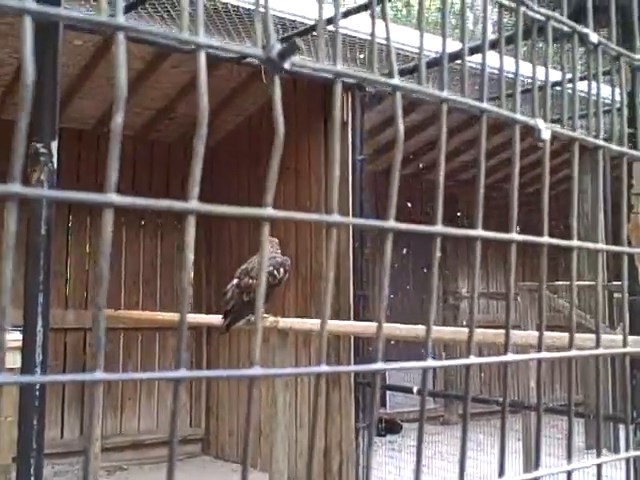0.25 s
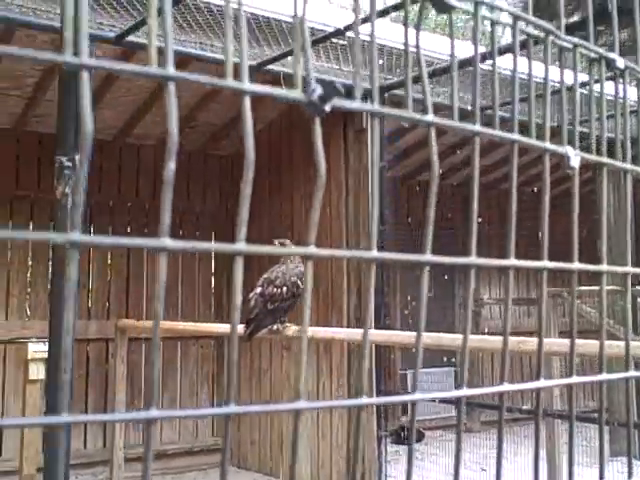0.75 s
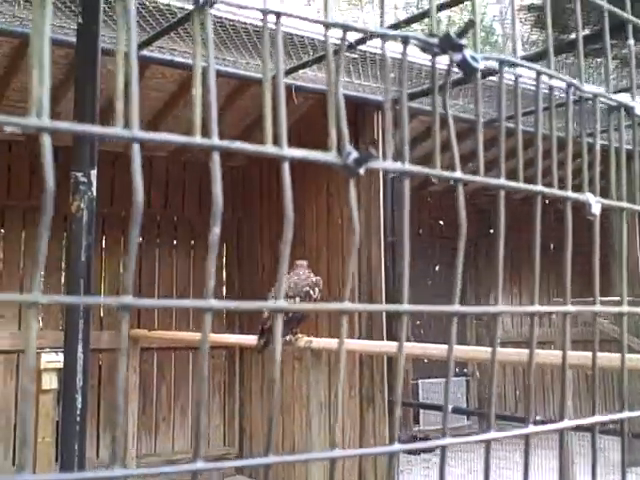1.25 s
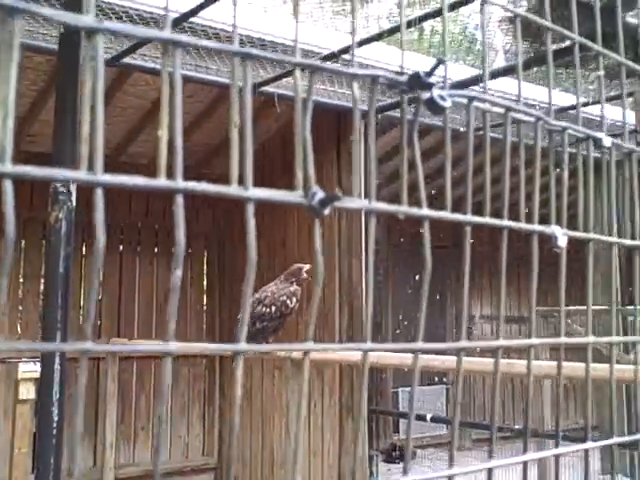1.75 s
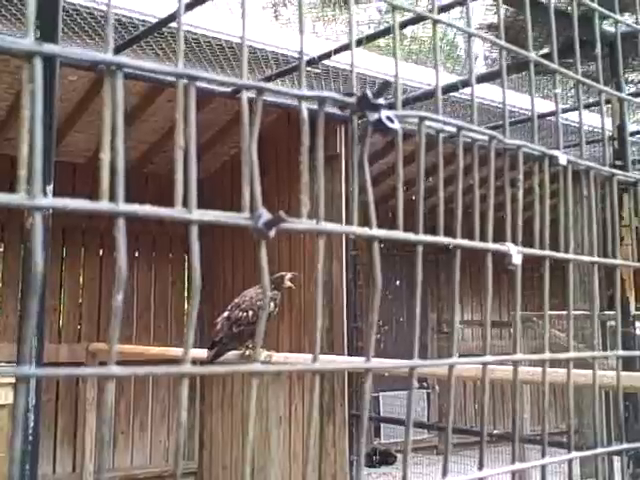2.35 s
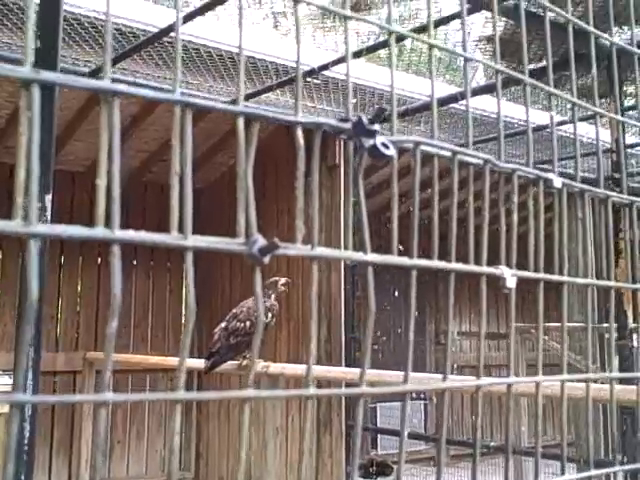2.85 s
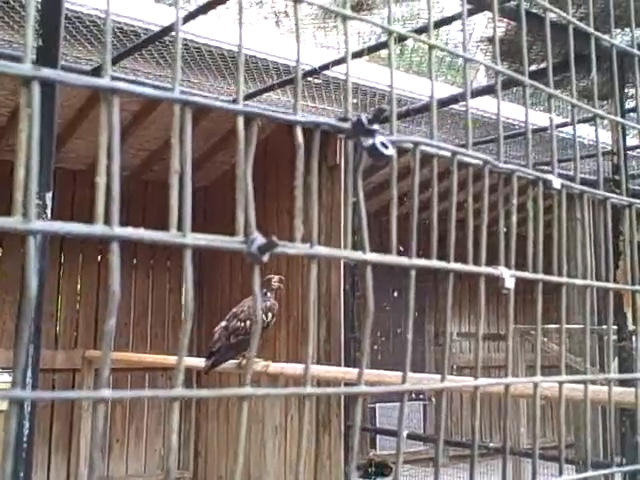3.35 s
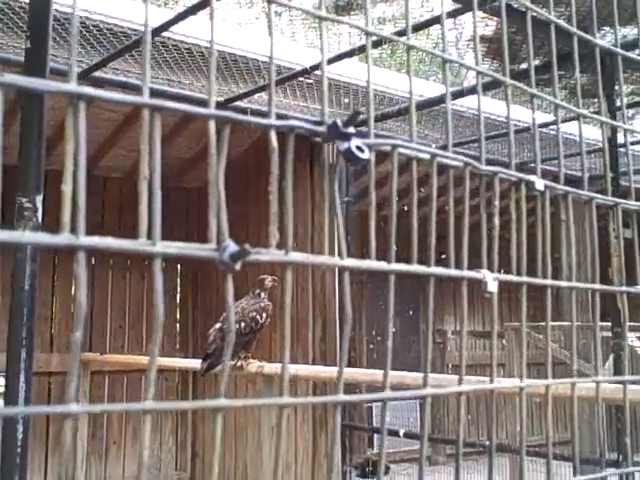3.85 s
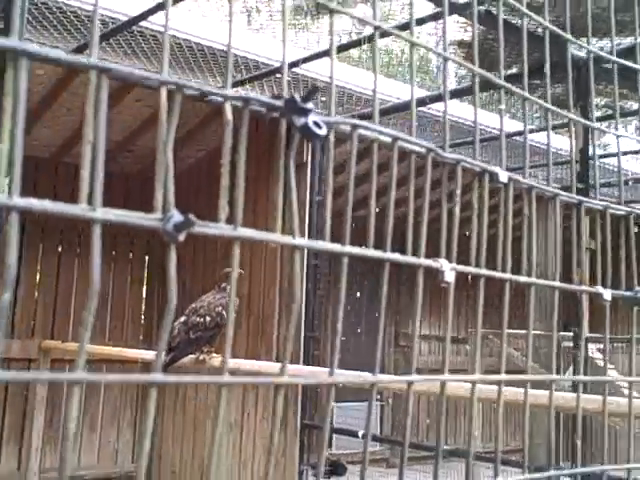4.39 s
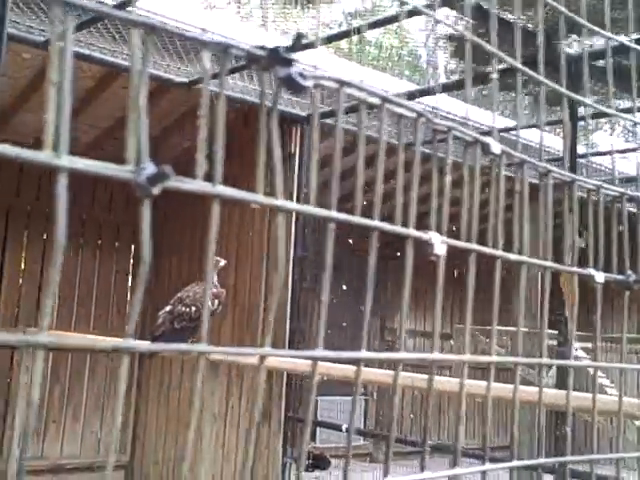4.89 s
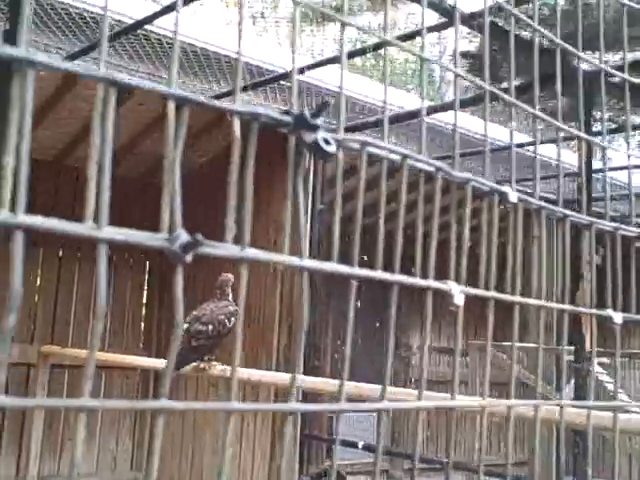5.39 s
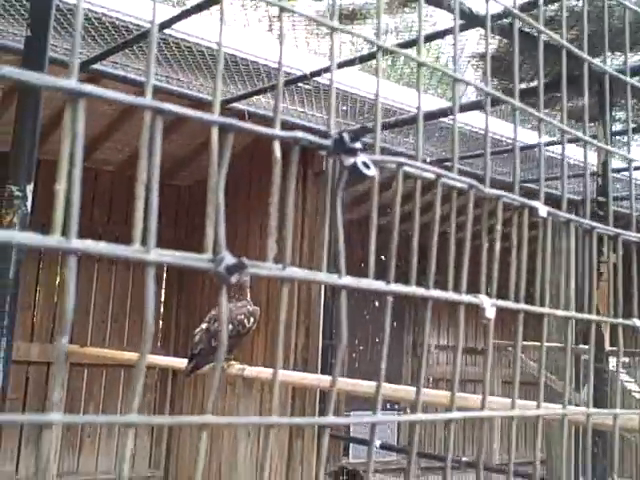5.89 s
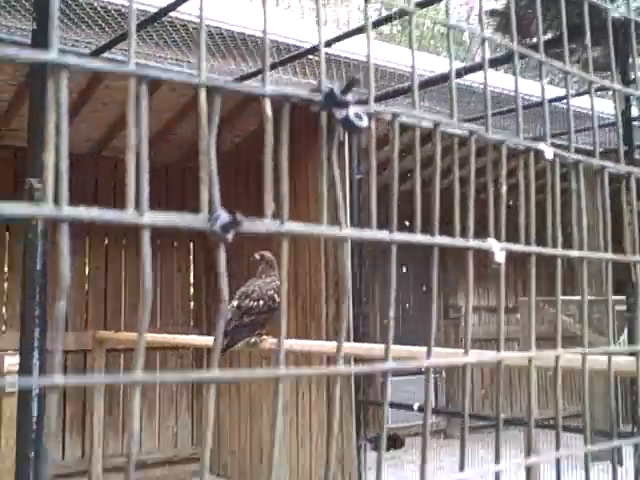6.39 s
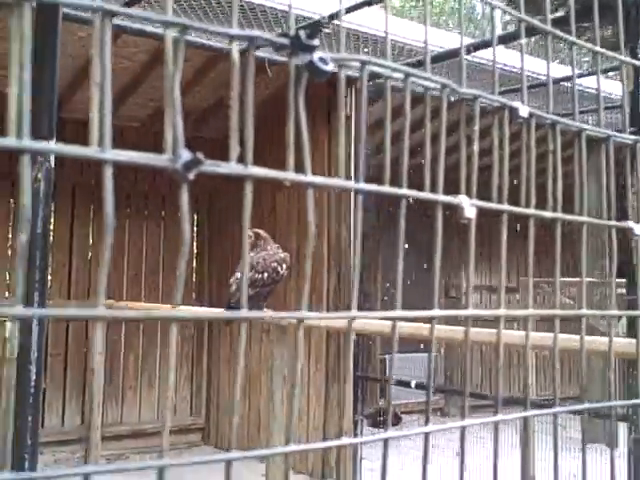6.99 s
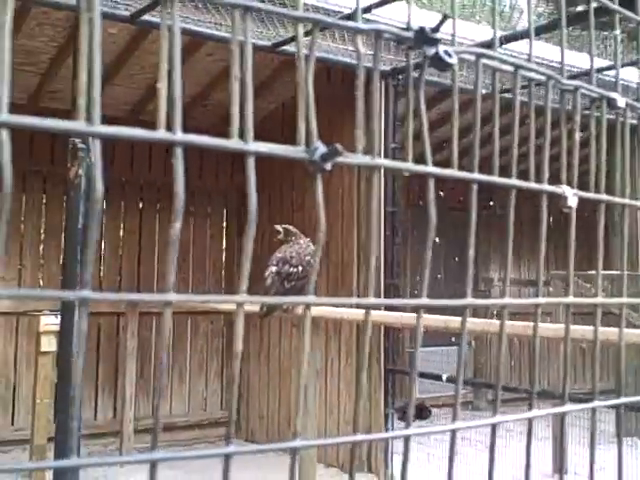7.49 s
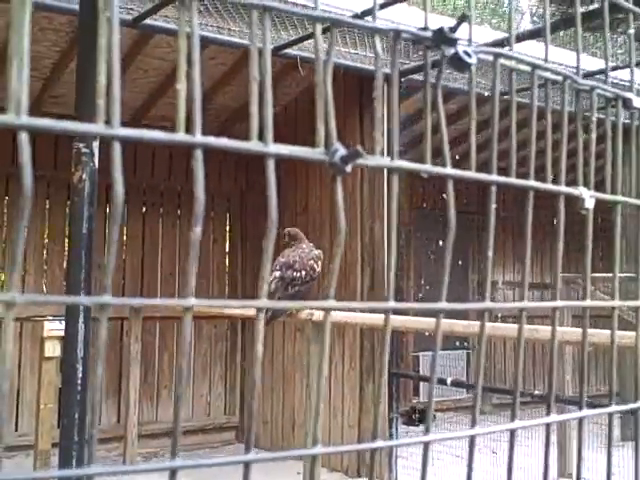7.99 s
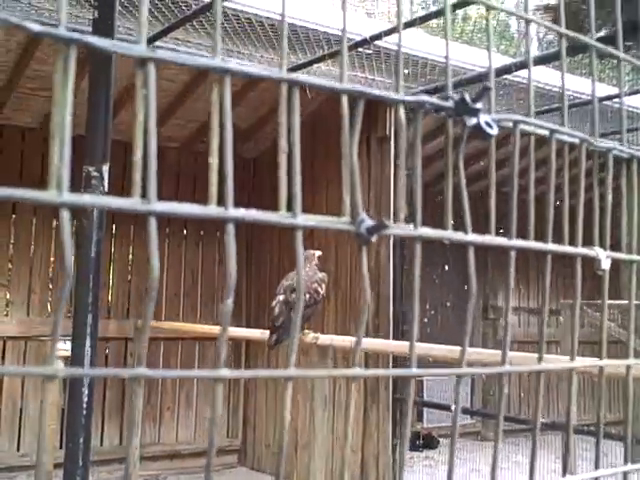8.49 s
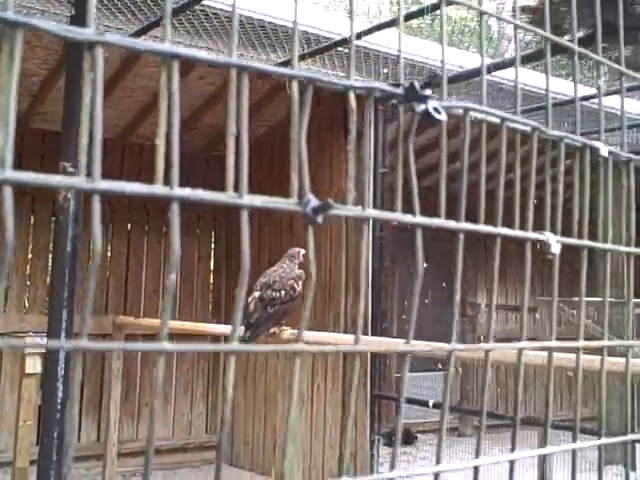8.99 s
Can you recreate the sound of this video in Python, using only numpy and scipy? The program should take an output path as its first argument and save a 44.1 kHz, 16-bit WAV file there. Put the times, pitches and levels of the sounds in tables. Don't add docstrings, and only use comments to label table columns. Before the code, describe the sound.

A large young bird of prey, a few metres from a small hand-held camera, gives quick bursts of low chucks mixed with high whistles and squeaks in the first few seconds. A long pause follows, filled with hiss, far traffic and crisp plastic creaks. Later it chirps again in shorter bursts while light gusts rumble on the microphone. Plank walls add a short, close echo.

```python
import sys
import numpy as np
from scipy import signal
from scipy.fft import rfft, irfft, next_fast_len
from scipy.io import wavfile
from scipy.ndimage import map_coordinates

SR = 44100
rng = np.random.default_rng(int(sys.argv[2]) if len(sys.argv) > 2 else 0)


def magnitude_from_level(level_db):
    exponent = np.asarray(level_db, float) / 20
    return 10 ** exponent


def master_out(mix):
    frames = np.transpose(np.atleast_2d(mix))
    ceiling = np.clip(frames, -1, 1)
    pcm = np.round(ceiling * 32767).astype(np.int16)
    wavfile.write(sys.argv[1], SR, pcm)


N = 407925

SQUEAK_SIDE_PARTIALS = [0, 0, -16.5]


def unit(x):
    return x / np.sqrt(np.mean(x ** 2) + 1e-20)


def along(points, hz):
    f, v = np.transpose(points)
    return np.interp(np.log(hz + 1), np.log(f + 1), v)


def wobble(rate):
    knots = rng.standard_normal(int(N * 2000 / SR) + 4)
    return map_coordinates(knots, [np.arange(N) * rate / SR])


def noise(response):
    m = next_fast_len(N)
    spectrum = rfft(rng.standard_normal(m)) * response(np.fft.rfftfreq(m, 1 / SR))
    return unit(irfft(spectrum, m)[:N])


def coloured(curve):
    return noise(lambda f: magnitude_from_level(along(curve, f)))


def band(low_hz, high_hz):
    return lambda f: 1 / np.sqrt((1 + (low_hz / (f + 1)) ** 8) * (1 + (f / high_hz) ** 8))


def hump(middle, half_width):
    return lambda x: np.exp(-.5 * ((x - middle) / half_width) ** 2)


def eagle():
    # freq_hz [Hz], level_db [dB per Hz]
    rasp_curve = [(600, -19), (1200, -14.5), (2200, -7), (3500, -7.5), (8000, -10), (12000, -15),
                  (16000, -8.5)]
    # freq_hz [Hz], level_db [dB per Hz]
    wheeze_curve = [(450, -27.5), (700, -15), (1400, -0.5), (2300, 10), (4500, -8.5), (8000, -14),
                    (16000, -21.5)]
    low, effort = chucks()
    whistle, left = whistles()
    squeak, right = squeaks()
    sum_tone = magnitude_from_level(6) * (left * right).imag
    voice = (low + whistle + squeak + croaks() + sum_tone) * magnitude_from_level(0.8 * wobble(150))
    airflow = magnitude_from_level(-29) * abs(left) + magnitude_from_level(-13.5) * abs(right)
    rasp = airflow * magnitude_from_level(4 * wobble(430)) * coloured(rasp_curve)
    wheeze = magnitude_from_level(-22.5) * effort * magnitude_from_level(2.5 * wobble(410)) * coloured(wheeze_curve)
    return voice + rasp + wheeze + clicks()


def note(s, length, rise, fall):
    n = round(s * SR) + np.arange(max(round(length * SR), 50))
    u = (n - n[0]) / len(n)
    swell = np.sin(np.pi / 2 * np.clip(np.minimum(u / rise, (1 - u) / fall), 0, 1)) ** 2
    return n, u, swell


def membrane(hz, n, tremor, shake):
    return np.exp(2j * np.pi * np.cumsum(hz * (1 + shake * tremor[n])) / SR)


def low_notes():
    # start_s [s], length_s [s], pitch_hz [Hz], level_db [dB], odd_overtones_db [dB]
    openers = [
        (0.127, 0.05, 787, -42.5, -20),
        (1.272, 0.0092, 713, -57, 11),
        (2.188, .014, 727, -59, 4),
        (7.003, 0.015, 760.4, -36.5, -2.5),
        (7.491, 0.047, 805, -42.5, -21),
        (7.61, 0.028, 617.5, -63.5, 14),
        (7.754, 0.033, 573, -66.5, 12),
    ]
    # start_s [s], length_s [s], top_pitch_hz [Hz], level_db [dB], odd_overtones_db [dB]
    full = [
        (0.241, 0.064, 771, -34, -8.5),
        (1.457, .07, 807.6, -31, -26),
        (1.562, .055, 763, -38, -6),
        (7.012, 0.045, 830, -39, -12),
        (7.116, .036, 712, -45, -4.5),
        (7.633, 0.018244, 734, -40, -2.5),
        (7.772, .013, 584, -58, -8),
        (8.525, .078, 782.4, -31.5, -25),
        (8.62, 0.076, 767, -36.5, -12.5),
        (8.739, 0.047, 565, -62, 10),
    ]
    # start_s [s], length_s [s], top_pitch_hz [Hz], level_db [dB], odd_overtones_db [dB]
    held = [
        (1.521, .036, 790.1, -36, -30.5),
        (2.519, .04, 747.5, -27.5, -16),
    ]
    kinds = [(openers, .04, -47.5), (full, -.11, -48), (held, -.02, -48)]
    rows = []
    for table, bend, tick_db in kinds:
        for s, length, hz, db, odd_db in table:
            rows.append((s, length, hz, hz * (1 + bend), db, odd_db, tick_db))
    return sorted(rows)


def chucks():
    # freq_hz [Hz], gain_db [dB]
    throat = [(500, -10.5), (800, -9), (1100, 8.5), (1500, -1.5), (2200, 5.5), (3000, -6), (4500, -9.5),
              (6000, -22.5), (7700, -25), (9000, -28), (12000, -40)]
    attack_s, release_s = .009, 0.02
    grow_db, grow_share = 6, .45
    scoop, scoop_s = .12, .008
    tone, effort, tremor = np.zeros(N), np.zeros(N), wobble(260)
    for s, length, top_hz, end_hz, db, odd_db, _ in low_notes():
        n, u, swell = note(s, length, rise=min(attack_s / length, .5), fall=min(release_s / length, .5))
        swell = swell * magnitude_from_level(-grow_db * np.clip(1 - u / grow_share, 0, 1))
        sag = np.clip(2.2 * u - .9, 0, 1) ** 1.2
        hz = top_hz * (1 - scoop * np.exp(-u * length / scoop_s)) + (end_hz - top_hz) * sag
        turn = membrane(hz, n, tremor, shake=.016)
        for k in range(1, 15):
            dull_db = 0.7 * min(db + 31, 0) * max(np.log2(k * top_hz / 2200), 0)
            level_db = db - 0.5 + along(throat, k * hz) + dull_db + odd_db * (k % 2)
            tone[n] += swell ** (1 + .2 * k) * magnitude_from_level(level_db) * (turn ** k).imag
        effort[n] += swell * magnitude_from_level(db)
    throb_hz = 95 * (1 + .25 * wobble(30))
    throb = 1 + .35 * np.cos(2 * np.pi * np.cumsum(throb_hz) / SR)
    return tone * throb * magnitude_from_level(1.5 * wobble(240)), effort


def glides(table, partials, rise, fall, bend, shake):
    tone, first, tremor = np.zeros(N), np.zeros(N, complex), wobble(300)
    for s, length, from_hz, to_hz, db, upper_db in table:
        n, u, swell = note(s, length, rise, fall)
        turn = membrane(from_hz + (to_hz - from_hz) * u ** bend, n, tremor, shake)
        for k, level_db in enumerate(partials):
            gain = magnitude_from_level(db + 4 + level_db + upper_db * (k > 0))
            tone[n] += swell ** (1 + .3 * k) * gain * (turn ** (k + 1)).imag
        first[n] += swell * magnitude_from_level(db + 5 + 0.6 * max(upper_db, 0)) * turn
    return tone, first


def whistles():
    # start_s [s], length_s [s], start_pitch_hz [Hz], end_pitch_hz [Hz], level_db [dB]
    calls = [(0.151, 0.03191, 2720, 2850, -41.5), (1.312, 0.035, 2926, 2774, -26.5),
             (1.331, 0.013, 2790, 2740, -33.5), (2.221, 0.037, 2883, 2370, -23.5),
             (2.296, 0.04, 2876, 2505, -19.5), (2.404, 0.009, 2616, 2710, -21.5),
             (2.412, 0.023, 2702, 2674, -30), (4.952, .011, 2750, 2540, -64),
             (7.021, .015, 2696, 2650, -31.5), (7.034, 0.018, 2692, 2637, -27),
             (7.058, 0.023, 2650, 2650, -33.5), (7.508, 0.031, 2800, 2620, -52)]
    whistle_partials = [-2.5, -6.5, -19.5, -31, -39]
    full_db, purer_per_db, bright_db, pure_db = -31, 1.2, -3, -19
    rows = []
    for row in calls:
        upper_db = np.clip(bright_db + purer_per_db * (row[-1] - full_db), pure_db, bright_db)
        rows.append((*row, upper_db))
    return glides(rows, whistle_partials, rise=.28, fall=.25, bend=1.9, shake=.0045)


def squeaks():
    # start_s [s], length_s [s], start_pitch_hz [Hz], end_pitch_hz [Hz], level_db [dB]
    plain = [
        (.262, 0.01664, 3270, 3500, -50.5),
        (1.312, 0.024, 3900, 3790, -34.5),
        (2.191, 0.0048, 3250, 4150, -35.5),
        (2.197, .015, 3800, 4167, -32.5),
        (2.206, 0.023, 4210, 4710, -38.5),
        (2.21, 0.028, 3700, 3580, -41),
        (2.288, .018, 3700, 4110, -35.5),
        (2.405, 0.01399, 3420, 3470, -48.5),
        (7.018, 0.034496, 4195, 4260, -49.5),
        (7.02, 0.018, 3470, 3529, -51),
    ]
    # start_s [s], length_s [s], start_pitch_hz [Hz],
    # end_pitch_hz [Hz], level_db [dB]
    pips = [
        (.155, 0.02137, 3450, 3580, -48.5),
        (1.272, .016, 4040, 3850, -55),
        (7.506, 0.038, 3615, 3480, -44.5),
    ]
    # start_s [s], length_s [s], start_pitch_hz [Hz], end_pitch_hz [Hz], level_db [dB]
    squeals = [
        (.172, .011, 3650, 4100, -61),
        (1.288, .0077, 3870, 3870, -44),
        (1.298, .012, 4280, 4246, -51.5),
        (1.3, .0136, 4590, 4750, -53),
        (1.368, .02, 3750, 3730, -51),
        (1.381, .022, 3784, 4420, -45.5),
        (1.396, .019, 4360, 4500, -49),
        (7.522, .035, 3775, 3740, -60.5),
    ]
    rows = []
    for table, octave_db in [(plain, -13.5), (pips, -2), (squeals, 13)]:
        rows += [(*row, octave_db) for row in table]
    return glides(rows, SQUEAK_SIDE_PARTIALS, rise=0.4, fall=.3, bend=0.88, shake=0.017)


def croaks():
    # start_s [s], length_s [s], pitch_hz [Hz], level_db
    # [dB]
    side_tones = [(.135, 0.0633, 2005, -61.5), (.248, 0.027, 2110, -44), (1.276, 0.033, 2922, -46.5),
                  (1.277, 0.043, 2115, -55), (1.372, 0.041, 2173, -56), (1.462, 0.032, 2150, -50),
                  (1.568, .051, 2000, -54), (2.206, .018, 2900, -40.5), (7.02, 0.01604, 2334, -51),
                  (7.118, .029, 1920, -66), (7.508, 0.01527, 2010, -55.5), (7.613, 0.0318, 1860, -59),
                  (7.751, 0.036, 1840, -65.5), (8.525, 0.12, 2050, -54.5), (8.63, .071, 2100, -58.5),
                  (8.745, .059, 1770, -64)]
    sag_hz_per_s, octave_db = 1100, -12.5
    rows = [(s, length, hz, hz - sag_hz_per_s * length, db, octave_db) for s, length, hz, db in side_tones]
    return glides(rows, SQUEAK_SIDE_PARTIALS, rise=0.14, fall=0.22, bend=1.1, shake=0.029)[0]


def clicks():
    lead_s, silence_s = .001, .02
    out, t, air, last = np.zeros(N), np.arange(600) / SR, noise(hump(1800, 600)), 0
    for s, length, *_, db in low_notes():
        if s - last > silence_s:
            n = round((s - lead_s) * SR) + np.arange(len(t))
            out[n] += magnitude_from_level(db - 60 * t / .025) * np.minimum(t / .0015, 1) * air[n]
        last = s + length
    return out


def tail(decays, delay):
    hz, t, z = signal.stft(rng.standard_normal(SR), SR, nperseg=256)
    fade = magnitude_from_level(-60 * t / along(decays, hz)[:, None])
    ring = signal.istft(z * fade, SR, nperseg=256)[1]
    return np.pad(ring / np.linalg.norm(ring), (round(delay * SR), 0))[:SR]


def aviary(x):
    # delay_s [s], level_db [dB]
    planks = [
        (.004, -17.5),
        (.009, -11.5),
        (0.016, -13.5),
        (0.022, -21.5),
        (.029, -20),
        (0.041, -21),
    ]
    # freq_hz [Hz], t60_s [s]
    shed_decay = [(500, 0.27), (3000, 0.26), (10000, 0.18)]
    # freq_hz [Hz], t60_s [s]
    yard_decay = [(500, 0.88), (3000, 0.94), (10000, 0.4)]
    wet, hop = np.zeros(N + 2 * SR), 2500
    for start in range(0, N - 2 * hop, hop):
        piece = x[start:start + 2 * hop] * signal.windows.hann(2 * hop, sym=False)
        if piece.any():
            answer = magnitude_from_level(-10) * tail(shed_decay, delay=0.0086) + magnitude_from_level(-23.0) * tail(yard_decay, delay=.04)
            for delay, db in planks:
                answer[round(delay * SR)] += magnitude_from_level(db)
            wet[start:][:2 * hop + SR - 1] += signal.fftconvolve(piece, answer)
    return x + wet[:N]


def handling():
    # start_s [s], peak_db [dB], low_part_db [dB], t60_s [s]
    creaks = [(4.441, -49, 5.5, 0.0198), (4.471, -62.5, 14, 0.02326), (4.536, -55, -18, 0.042),
              (4.63, -50, -13, .06), (4.671, -44, -11, 0.041), (4.827, -48.5, -9.5, 0.056),
              (4.868, -51, -8.5, 0.055), (4.897, -44.5, -13, 0.02), (4.923, -46.5, -7.5, .02),
              (4.95, -43.5, -8.5, .04), (4.99, -41, -13.5, 0.039), (5.004, -49, -4, 0.053),
              (5.078, -57.5, -12, .04), (5.139, -38.5, -9.5, 0.1), (5.155, -52, -4, 0.041),
              (5.16, -53.5, -1, 0.35), (5.279, -56, -7.5, 0.034), (5.294, -56, -17.5, 0.033)]
    # start_s [s], peak_db [dB]
    taps = [
        (0.7555, -60.5),
        (2.644, -49.5),
        (5.8556, -54),
        (7.3886, -51),
        (9.1221, -52.5),
    ]
    t = np.arange(SR // 4) / SR
    high, low, wood = noise(hump(13900, 3000)), noise(band(2300, 10200)), noise(band(550, 2800))
    out = np.zeros(N)
    for s, db, low_db, t60 in creaks:
        n = round(s * SR) + np.arange(len(t))
        swell = magnitude_from_level(db - 7 - 60 * t / max(t60, .004)) * np.minimum(t / .003, 1)
        out[n] += swell * (high[n] + magnitude_from_level(low_db) * low[n])
    for s, db in taps:
        n = np.minimum(round(s * SR) + np.arange(len(t)), N - 1)
        out[n] += magnitude_from_level(db - 7.0 - 60 * t / 0.06536) * wood[n]
    return out


def wind(flurry):
    # middle_s [s], half_width_s [s], level_db [dB]
    puffs = [
        (7.13, 0.12, -66),
        (7.36, 0.16, -53.5),
        (7.64, 0.085, -51.5),
        (7.81, 0.055, -50.5),
        (8.04, 0.1, -53),
        (8.51, 0.053, -56),
        (8.66, 0.028, -58),
        (9.25, .05, -53.5),
    ]
    # freq_hz [Hz], level_db [dB per Hz]
    port_curve = [(8.8, -30), (15, 4), (52, 5), (84, -0.5), (296, -31), (400, -29.5), (520, -52.5),
                  (880, -120)]
    t = np.arange(N) / SR
    strength = magnitude_from_level(-67.5 + 1.8 * wobble(7))
    for s, half_width, db in puffs:
        strength = strength + magnitude_from_level(db) * hump(s, half_width)(t)
    gust = strength * magnitude_from_level(2.5 * wobble(12) + 1.5 * flurry) * coloured(port_curve)
    u = (t - 8.5035) / 0.0025
    thump = magnitude_from_level(-34) * -(u + 0.5595) * np.exp(-u * u / 2)
    return gust + thump


def traffic(flurry):
    # freq_hz [Hz], level_db [dB per Hz]
    rumble_curve = [(12, -30), (20, -1.5), (124, 1), (211, -5), (327, -8), (394, -10), (508, -10.5),
                    (1500, -22.5), (5000, -32), (6500, -57), (11000, -120)]
    rumble = magnitude_from_level(-61.5 + .6 * wobble(4.5) + 1.7 * flurry) * coloured(rumble_curve)
    hum = magnitude_from_level(-71.0) * noise(hump(120, 8.4))
    return rumble + hum


def insects():
    return magnitude_from_level(-72 + 0.93 * wobble(60)) * noise(hump(10040, 560))


def hiss():
    # freq_hz [Hz], level_db [dB per Hz]
    hiss_curve = [(1000, 6.5), (4000, 0), (8500, 1.5), (11500, 0.5), (13800, 2), (15800, -3)]
    rise_db_per_s, settles_s = 0.94, 5.953
    t = np.arange(N) / SR
    return magnitude_from_level(-72.5 + rise_db_per_s * np.minimum(t, settles_s)) * coloured(hiss_curve)


def surroundings():
    flurry = wobble(25)
    return wind(flurry) + traffic(flurry) + insects() + hiss()


def scene():
    return (aviary(eagle()) + handling() + surroundings())[None]


def band_limit(x):
    return signal.sosfilt(signal.butter(12, 16440, fs=SR, output="sos"), x)


def record(dry):
    top_hz = 15830
    m = next_fast_len(N)
    kept = irfft(rfft(dry, m) * (np.fft.rfftfreq(m, 1 / SR) < top_hz), m)[:, :N]
    return band_limit(kept)


dry = scene()
out = record(dry)
master_out(out)
```